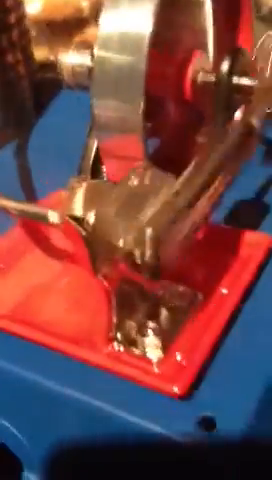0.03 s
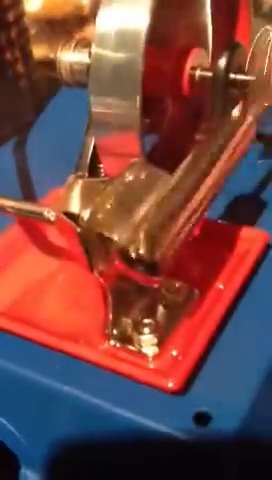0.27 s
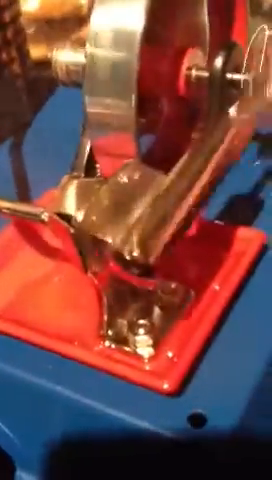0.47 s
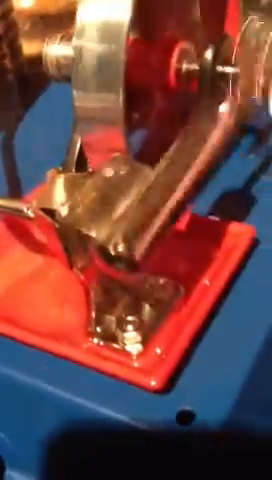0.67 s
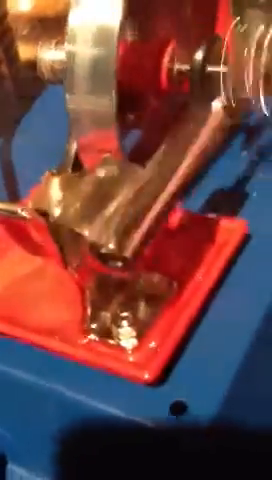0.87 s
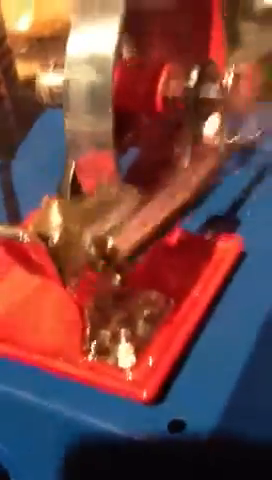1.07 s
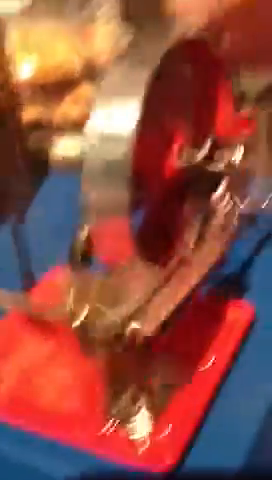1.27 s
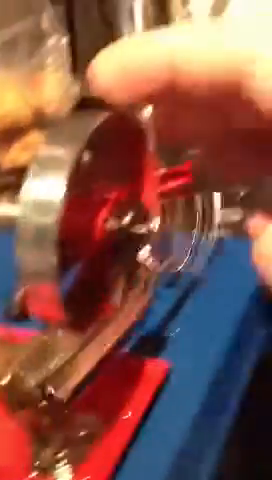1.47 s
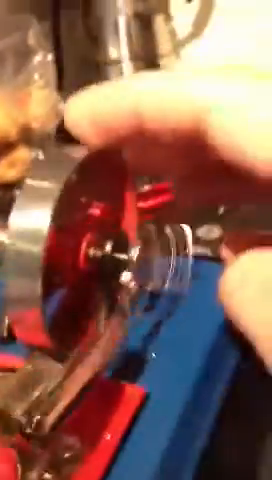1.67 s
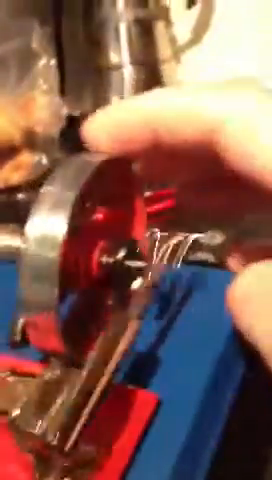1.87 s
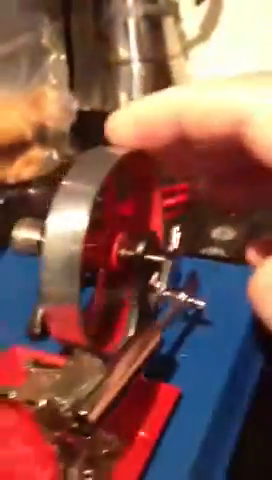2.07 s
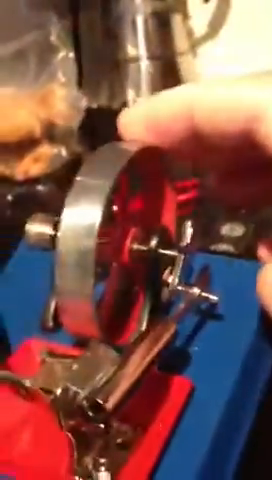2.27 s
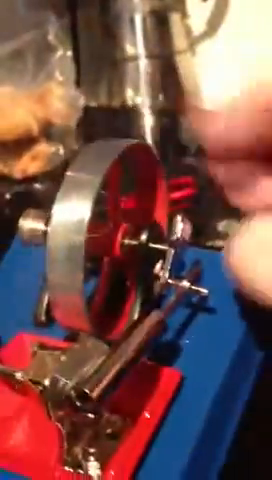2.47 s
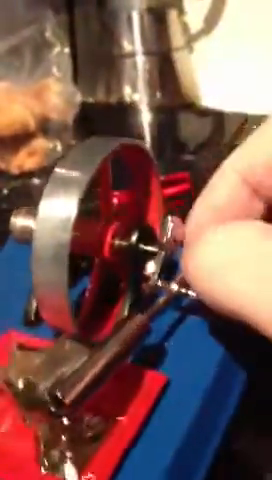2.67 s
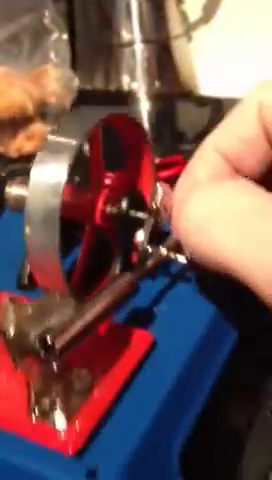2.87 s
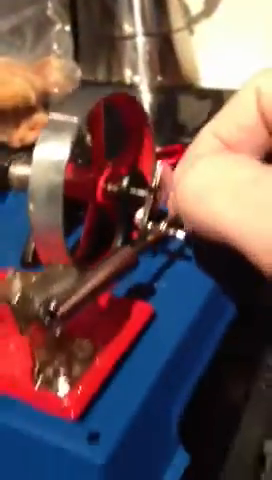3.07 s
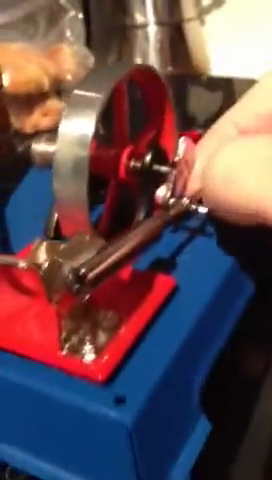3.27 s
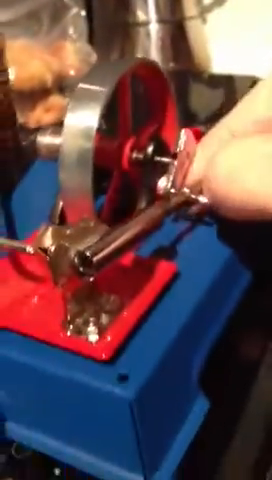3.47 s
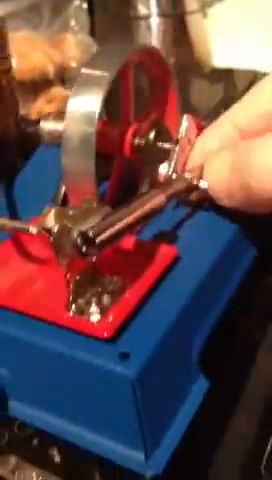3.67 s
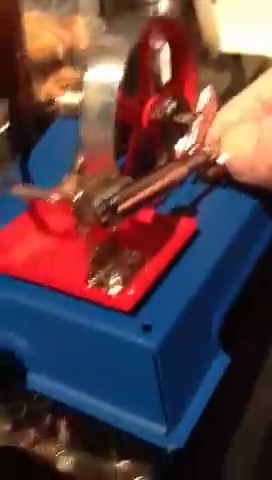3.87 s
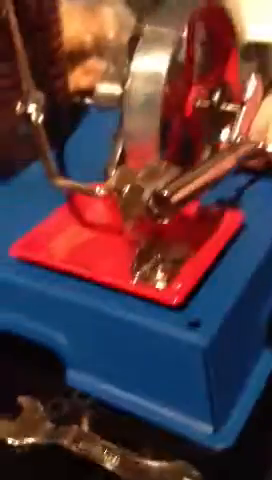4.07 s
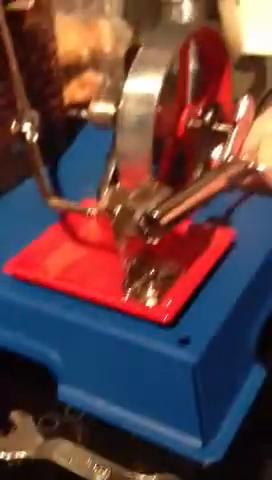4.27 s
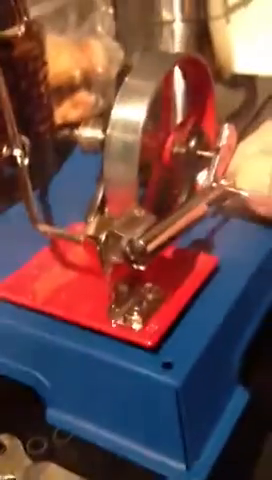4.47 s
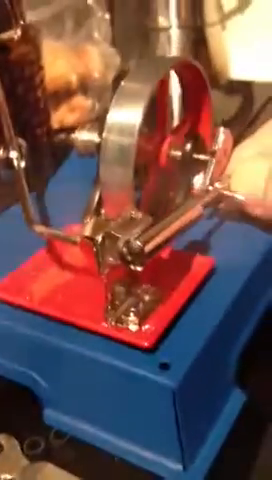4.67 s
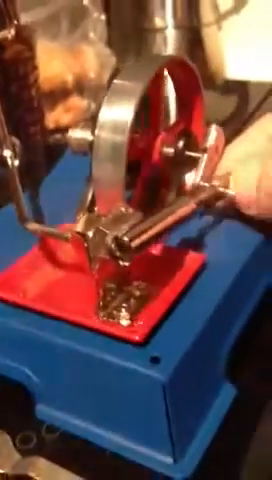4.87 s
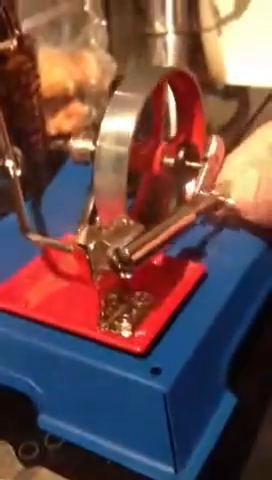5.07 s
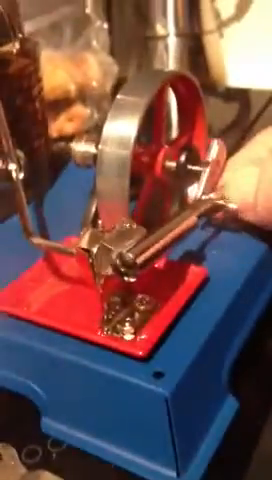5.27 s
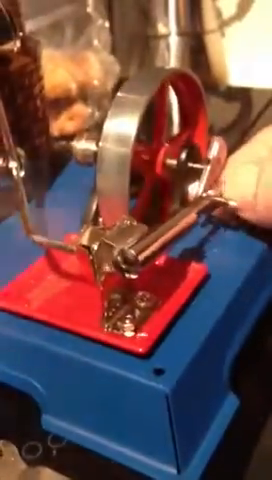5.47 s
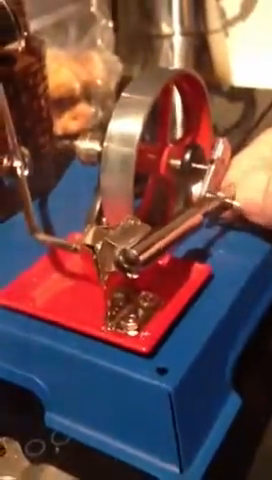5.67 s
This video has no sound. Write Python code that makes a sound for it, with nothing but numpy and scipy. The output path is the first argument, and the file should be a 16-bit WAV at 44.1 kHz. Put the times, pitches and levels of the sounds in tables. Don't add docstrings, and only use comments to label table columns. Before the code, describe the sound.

Close up in a small room, a toy steam engine runs fast, about nine crisp hissing chuffs a second alternating with metallic clatter. It slows slightly and is stopped by hand at two seconds. Light finger ticks on metal follow over a soft burner roar, then a long loud steam burst and three shorter ones, each ending in a sharp spit. Close phone microphone, thin in the bass.

```python
import sys
import numpy as np
from scipy import signal
from scipy.fft import rfft, irfft, next_fast_len
from scipy.io import wavfile
from scipy.ndimage import uniform_filter1d, map_coordinates

SR = 44100
rng = np.random.default_rng(int(sys.argv[2]) if len(sys.argv) > 2 else 0)


def wrap_up_sound(samples):
    columns = np.atleast_2d(samples).T
    tamed = np.clip(columns, -1, 1)
    steps = np.round(tamed * 32767).astype(np.int16)
    wavfile.write(sys.argv[1], SR, steps)


def volts_from_decibels(level):
    exponent = np.asarray(level, float) / 20
    return 10 ** exponent


N = 252693
TIME = np.arange(N) / SR
STROKE_T = np.arange(SR // 8) / SR


def unit(x):
    return x / np.sqrt(np.mean(x ** 2) + 1e-20)


def filtered(x, response):
    m = next_fast_len(N + SR // 2)
    return irfft(rfft(x, m) * response(np.fft.rfftfreq(m, 1 / SR)), m)[:N]


def noise(response):
    return unit(filtered(rng.standard_normal(N), response))


def coloured(spectrum):
    f, db = np.transpose(spectrum)
    return lambda hz: volts_from_decibels(np.interp(np.log(hz + 1), np.log(f + 1), db))


def resonant(modes):
    def response(f):
        total = 0
        for k, (hz, width, db) in enumerate(modes):
            damping = 1j * f * width
            total = total + (-1) ** k * volts_from_decibels(db) * damping / (hz * hz - f * f + damping)
        return total
    return response


def resonate(x, hz, width_hz):
    return signal.lfilter(*signal.iirpeak(hz, hz / width_hz, SR), x)


def level_curve(rows):
    s, db = np.transpose(rows)
    return volts_from_decibels(np.interp(TIME, s, db, -150, -150))


def wobble(rate):
    return map_coordinates(rng.standard_normal(int(N * rate / SR) + 4), [np.arange(N) * rate / SR])


def pulse(rise_s, t60_s):
    return np.minimum(STROKE_T / rise_s, 1) * volts_from_decibels(-60 * STROKE_T / t60_s)


def add(track, s, shape):
    at = round(s * SR)
    part, shape = track[max(at, 0):], shape[max(-at, 0):]
    part[:len(shape)] += shape[:len(part)]


# hz, level_db (dB per Hz)
ROOM_SPECTRUM = [(18, -96), (30, -26.5), (160, -2), (180, -2), (227, -8.5), (297, -2), (404, -19.5),
                 (481, -12), (908, -14), (1000, -22), (1310, -16.5), (3000, -24), (3900, -55), (6600, -120)]
# hz, level_db (dB per Hz)
BURNER_SPECTRUM = [(1470, -22), (2500, -7.5), (3870, -5.5), (4370, -7), (4710, -5), (5280, -10), (6140, -7),
                   (7140, -3.5), (9520, -6), (12100, -0.5), (15200, -7.5)]
# hz, width_hz, level_db (rms)
ROAR = [(275, 84, -49.5), (346.5, 28, -63.5), (491.7, 16, -62.5), (1150, 88, -61), (1310, 20, -67)]
# hz, level_db (rms)
ROOM_HUM = (191, -50)


def room():
    air = volts_from_decibels(-47.5 + wobble(4.99)) * noise(coloured(ROOM_SPECTRUM))
    hiss = volts_from_decibels(-51 + 0.64 * wobble(5)) * noise(coloured(BURNER_SPECTRUM))
    roar = np.zeros(N)
    for hz, width, db in ROAR:
        mode = resonant([(hz, width, 0)])
        roar += volts_from_decibels(db + 2.3 * wobble(5.4)) * noise(lambda f: mode(f) ** 2)
    hum_hz, hum_db = ROOM_HUM
    phase = 2 * np.pi * np.cumsum(hum_hz + 3.45 * wobble(9.8)) / SR
    hum = volts_from_decibels(hum_db + 5 + 2.3 * wobble(18)) * np.sin(phase)
    return air + hiss + roar + hum


def walls(x):
    t = np.arange(SR // 4) / SR
    tail = rng.standard_normal(len(t)) * volts_from_decibels(-60 * t / 0.12) * (t > .003)
    return signal.fftconvolve(x, tail / np.linalg.norm(tail))[:N]


# start_s, level_db
RUNNING_GEAR = [
    (0.0, -37),
    (0.14, -33.5),
    (0.99, -33.5),
    (1.7, -35.5),
    (1.9, -40.5),
    (1.98, -40),
    (2.07, -53),
    (2.25, -69),
]


def table():
    shake = level_curve(RUNNING_GEAR) * volts_from_decibels(-10 + 2.9 * wobble(12.3))
    return shake * noise(lambda hz: 1 / (1 + (hz / 45) ** 4))


def impacts(rate, spread_db):
    happens = rng.random(N) < rate / SR
    return unit(happens * rng.standard_normal(N) * volts_from_decibels(spread_db * rng.standard_normal(N)))


def ring(force, modes, shift_db):
    out, knots = np.zeros(N), np.arange(0, N + SR, SR // 22)
    for hz, width, db in modes:
        drive = np.interp(np.arange(N), knots, volts_from_decibels(db + shift_db * rng.standard_normal(len(knots))))
        out += resonate(force * drive, hz, width)
    power = sum(volts_from_decibels(2 * db) * width * np.pi / SR for _, width, db in modes)
    return out / np.sqrt(power)


def struck(hz, width_hz, force):
    tone = resonate(force * rng.standard_normal(len(force)), hz, width_hz)
    return tone / np.sqrt(np.max(uniform_filter1d(tone ** 2, size=200)))


# hz, width_hz, level_db
HOLLOW_MODES = [(250, 72, -3.5), (356, 190, -13.5), (480, 23, -5), (579, 51, -9.5), (719, 61, -2),
                (811, 102, -7.5)]
# hz, width_hz, level_db
PLATE_MODES = [(1130, 94, -1), (1293, 112, -2.5), (1490, 29, -4), (1740, 220, -1), (2010, 125, -7.5),
               (2185, 130, -7)]
# hz, width_hz, level_db
BRASS_MODES = [(2790, 470, -10), (3360, 58, -0.5), (3740, 430, 3.5), (4163, 134, 3), (4560, 143, 5.5),
               (4966, 110, 0), (5780, 460, -6), (6390, 215, 0.5), (6930, 67, 1), (7630, 140, -12.5),
               (7870, 170, 1)]


def metal(hollow_force, plate_force, brass_force, hits):
    soft = filtered(hits, lambda hz: 1 / (1 + 1j * hz / 3000) ** 2)
    hollow = ring(hollow_force * soft, HOLLOW_MODES, shift_db=1.5)
    plate = ring(plate_force * soft, PLATE_MODES, shift_db=2)
    return hollow + plate + ring(brass_force * hits, BRASS_MODES, shift_db=2.5)


# start_s,
# brass_db, plate_db, pitch_hz (plate note)
FINGER_TICKS = [(1.985, -50, -35, 487), (2.0046, -48, -30.5, 1300), (2.042, -54, -38, 482),
                (2.07, -39.5, -40.5, 1310), (2.1306, -39, -52, 1190), (2.142, -38.5, -49, 1130),
                (2.4, -63, -47, 847), (2.4955, -61, -44.5, 1490), (2.5087, -58, -48, 1130),
                (2.608, -43, -46, 1327), (2.6183, -33.5, -40, 1860), (2.7278, -37.5, -41, 1310),
                (3.1, -60, -46, 1310), (3.1297, -55, -45, 1310), (3.2774, -34, -34, 1130),
                (3.286, -48, -38, 696), (3.517, -44, -43, 593), (4.752, -30, -35, 1183),
                (4.8122, -43, -41, 1290), (5.06, -23.5, -34.5, 1286), (5.1422, -31, -39, 1075),
                (5.4203, -21, -33, 1120), (5.4454, -30, -35, 794), (5.7097, -50, -55, 1460)]


def fingers():
    plate, brass, note = np.zeros(N), np.zeros(N), np.zeros(N)
    fade = pulse(0.0015, 0.064)
    spring = np.sin(2 * np.pi * 4540 * STROKE_T)
    for s, brass_db, plate_db, plate_hz in FINGER_TICKS:
        add(plate, s, volts_from_decibels(plate_db - 2) * fade)
        add(brass, s, volts_from_decibels(brass_db - 14) * fade)
        add(note, s, volts_from_decibels(plate_db - 0.5) * fade ** 0.65 * np.sin(2 * np.pi * plate_hz * STROKE_T))
        add(note, s, volts_from_decibels(brass_db - 13.5) * fade ** 1.5 * spring)
    hits = impacts(14000, spread_db=4.5)
    dull = resonant([(2300, 5000, 0)])
    scuff = volts_from_decibels(-3) * (plate + brass) * unit(filtered(hits, lambda hz: dull(hz) ** 2))
    return metal(volts_from_decibels(-6.5) * plate, plate, brass, hits) + note + scuff


# start_s, force_db, plate_pitch_hz, brass_pitch_hz (loudest note of each)
CRANK_KNOCKS = [(0.0213, -5.5, 1120, 4480), (0.127, -9, 1310, 4700), (0.2324, -10.5, 1164, 4740),
                (0.342, -8.5, 1090, 4980), (0.45, -8.5, 1130, 3360), (0.5567, -10, 1150, 6330),
                (0.6637, -9.5, 1310, 6340), (0.7723, -10.5, 700, 4780), (0.8785, -10, 1240, 4500),
                (0.986, -6, 1130, 4500), (1.0923, -10.5, 1770, 6390), (1.2006, -11.5, 1250, 6200),
                (1.3099, -11.5, 1160, 3800), (1.4154, -11, 1740, 3760), (1.5214, -8, 1325, 3740),
                (1.6321, -12, 1150, 3940), (1.739, -8, 1310, 3760), (1.8588, -8.5, 736, 3860)]


def clatter():
    hollow, plate, brass, note = np.zeros(N), np.zeros(N), np.zeros(N), np.zeros(N)
    spray, push = pulse(0.0054, 0.069), pulse(0.0091, 0.088)
    lead_s = 0.023
    for s, db, plate_hz, brass_hz in CRANK_KNOCKS:
        plate_db = -18 + 0.37 * db
        add(brass, s, volts_from_decibels(db - 11.5) * spray)
        add(plate, s + 0.00021, volts_from_decibels(plate_db + 1) * push)
        add(hollow, s + 0.0033, volts_from_decibels(plate_db - 4.5) * push ** 0.9)
        add(note, s, volts_from_decibels(db - 19.5) * struck(brass_hz, 110, spray))
        add(note, s, volts_from_decibels(plate_db - 8.5) * struck(plate_hz, 63, push))
        add(plate, s - lead_s, volts_from_decibels(-31) * pulse(0.0062, 0.17))
        add(brass, s - lead_s, volts_from_decibels(-28) * pulse(0.012, 0.087))
    rattle = level_curve(RUNNING_GEAR)
    hits = impacts(6000, spread_db=0.5)

    def scraping(hz):
        return 1j * hz / 1500 / (1 + 1j * hz / 1500) / (1 + 1j * hz / 7000) ** 2

    scrape = volts_from_decibels(-17.5) * brass * unit(filtered(hits, scraping))
    shaken = metal(hollow + volts_from_decibels(-7) * rattle, plate + volts_from_decibels(-4.5) * rattle, brass + volts_from_decibels(-7) * rattle, hits)
    return shaken + note + scrape


def steam(spectrum, spit_db, sputter_db):
    jet = rng.standard_normal(N) * volts_from_decibels(spit_db * wobble(2500) + sputter_db * wobble(120))
    jet = unit(filtered(jet, coloured(spectrum)))
    body = filtered(jet, lambda hz: 1 / (1 + (hz / 4930) ** 4))
    return body, jet - body


def port(s, shut_s, db, opening_s, closing_s):
    before, after = np.maximum(s - TIME, 0), np.maximum(TIME - shut_s, 0)
    held_db = db - 1.35 * (db + 31.5) * (np.clip(TIME, s, shut_s) - s)
    jet = volts_from_decibels(held_db - 30 * (before / opening_s + after / closing_s))
    cloud = (after > 0) * volts_from_decibels(held_db - 23 - 60 * after / 0.97)
    return np.array([jet, cloud])


# hz, level_db (dB per Hz)
BURST_SPECTRUM = [(350, -27), (600, -19.5), (1230, -18.5), (1430, -16), (2000, -14.5), (2260, -13.5),
                  (3040, -8.5), (3670, -9.5), (4620, -6.5), (5220, -9.5), (6400, -4), (10300, -6),
                  (11900, 0.5), (15200, -7.5)]
# hz, width_hz, level_db
PASSAGE_MODE = (3220, 330, -6.5)
# start_s (wide open), shut_s, level_db, opening_s, closing_s
HAND_BURSTS = [
    (3.519, 3.594, -37, 0.034, .05),
    (4.423, 4.734, -17.5, 0.054, .017),
    (4.934, 5.051, -22.5, 0.036, .024),
    (5.131, 5.274, -22.5, 0.022, 0.038),
    (5.433, 5.626, -24, 0.0099, 0.036),
]
# start_s (wide open), shut_s, level_db, opening_s, closing_s
THIN_WISPS = [
    (3.237, 3.258, -47, .01, .04),
    (3.75, 3.752, -43, .025, 0.04),
    (3.798, 3.855, -46, 0.018, 0.11),
]
# start_s, level_db
SEEPING = [
    (3.87, -70),
    (3.93, -57),
    (4.06, -58),
    (4.146, -47),
    (4.23, -45.5),
    (4.306, -49),
    (4.36, -43.5),
    (4.42, -66),
]
# start_s, level_db (peak)
PORT_SPURTS = [
    (3.7429, -43),
    (3.881, -26),
    (4.724, -8),
    (5.0404, -9.5),
    (5.2707, -23),
    (5.6196, -9),
]
# start_s, length_s, from_hz, to_hz, level_db
PORT_WHISTLE = [
    (3.893, .045, 12050, 11900, -52),
    (4.185, .085, 11200, 12700, -44),
]


def bursts():
    body, hiss = steam(BURST_SPECTRUM, spit_db=2, sputter_db=0.85)
    body = body + filtered(body, resonant([PASSAGE_MODE]))
    wide, cloud = sum(port(*row) for row in HAND_BURSTS)
    thin = sum(port(*row)[0] for row in THIN_WISPS)
    seep = level_curve(SEEPING)
    body_gain = volts_from_decibels(-2) * wide + volts_from_decibels(-23) * thin + volts_from_decibels(5.5) * seep + cloud
    jet = (wide + thin + seep) * hiss + body_gain * body

    spurt, t = np.zeros(N), np.arange(SR // 30) / SR
    for s, db in PORT_SPURTS:
        add(spurt, s, volts_from_decibels(db - 9.5) * (t / 0.0034) * np.exp(1 - t / 0.0014))

    whistle, flutter = np.zeros(N), 1 + .004 * wobble(300)
    for s, length_s, from_hz, to_hz, db in PORT_WHISTLE:
        u = np.arange(round(length_s * SR)) / (length_s * SR)
        pitch_hz = (from_hz + (to_hz - from_hz) * u ** 1.3) * flutter[round(s * SR):][:len(u)]
        swell = np.sin(np.pi * u ** 1.4) ** 2.2
        add(whistle, s, volts_from_decibels(db) * swell * np.sin(2 * np.pi * np.cumsum(pitch_hz) / SR))
    return jet + spurt * (hiss + volts_from_decibels(0.5) * body) + whistle


# hz, level_db (dB per Hz)
CHUFF_SPECTRUM = [(880, -56), (1500, -23), (1970, -25), (2580, -16), (4360, -7.5), (5240, -14.5),
                  (5940, -8.5), (8670, -4), (11700, -3), (13100, -2), (15200, -11.5)]
# start_s, level_db (peak), open_s, pitch_hz (edge tone)
EXHAUST_CHUFFS = [(-0.039, 4, 0.019, 11900), (0.0676, -8, 0.015, 11500), (0.1758, -8, 0.014, 11700),
                  (0.2825, -8, 0.013, 12200), (0.39, -7, 0.012, 12040), (0.4963, -7.5, 0.015, 11550),
                  (0.603, -7.5, 0.016, 11700), (0.7114, -8.5, 0.017, 11900), (0.818, -8.5, 0.019, 12200),
                  (0.926, -6.5, 0.014, 12100), (1.032, -10, 0.022, 11700), (1.1414, -6, 0.013, 11930),
                  (1.248, -9.5, 0.018, 12400), (1.355, -10.5, 0.018, 11900), (1.463, -10, 0.013, 12200),
                  (1.57, -11.5, 0.019, 12800), (1.678, -12, 0.016, 11300), (1.7917, -12.5, 0.017, 11050),
                  (1.924, -13.5, 0.028, 12200)]


def exhaust():
    top, low, edge = np.zeros(N), np.zeros(N), np.zeros(N)
    for s, db, open_s, edge_hz in EXHAUST_CHUFFS:
        after = np.maximum(STROKE_T - open_s, 0)
        opening = np.minimum(STROKE_T / 0.0059, 1) ** 0.41
        shutting = volts_from_decibels(-60 * after / 0.049) + volts_from_decibels(-17.5 - 60 * after / 0.094)
        blow = opening * volts_from_decibels(-150 * STROKE_T) * shutting
        add(top, s - .002, volts_from_decibels(db - 11) * blow)
        add(low, s, volts_from_decibels(-21 + 0.11 * db) * blow)
        tone = resonate(rng.standard_normal(len(STROKE_T)), edge_hz, 300)
        add(edge, s - .002, volts_from_decibels(db - 14) * blow * unit(tone))
    for s, db, *_ in CRANK_KNOCKS:
        puff_db = -20.5 + 0.3 * db - 2.5 * s
        add(top, s - .004, volts_from_decibels(puff_db) * pulse(0.0012, 0.047))
    body, hiss = steam(CHUFF_SPECTRUM, spit_db=-0.5, sputter_db=1)
    leak = level_curve(RUNNING_GEAR) * volts_from_decibels(-31 + 9.5 * TIME)
    return (top + leak) * hiss + low * body + edge


def scene():
    engine = exhaust() + clatter() + fingers() + bursts()
    return (engine + volts_from_decibels(-11.5) * walls(engine) + room() + table())[None]


def low_pass(x):
    return signal.sosfilt(signal.butter(12, 16620, fs=SR, output="sos"), x)


def record(dry):
    def microphone(hz):
        return (hz < 15350) * (1j * hz / 130 / (1 + 1j * hz / 130)) ** 3

    mic = filtered(dry[0], microphone)
    return low_pass(mic[None])


dry = scene()
out = record(dry)
wrap_up_sound(out)
```